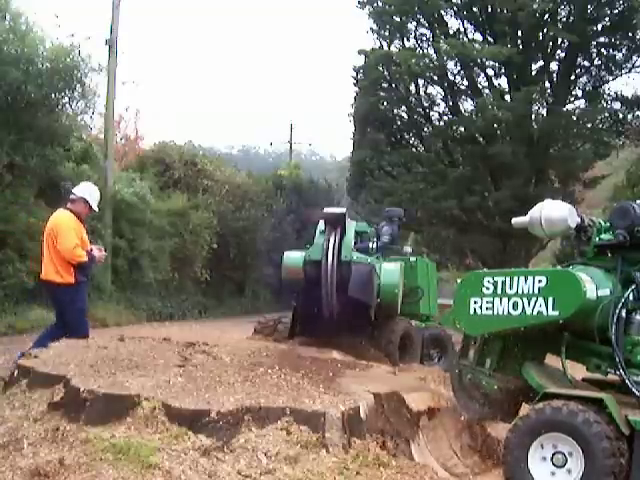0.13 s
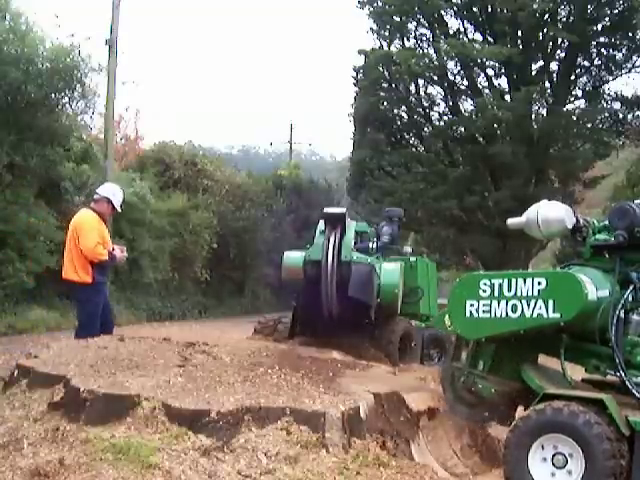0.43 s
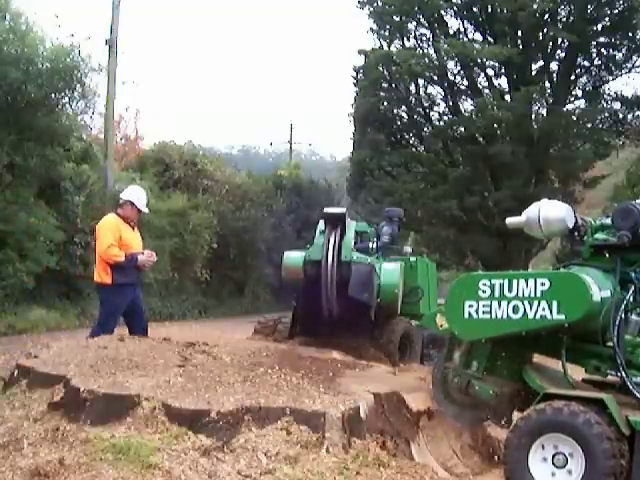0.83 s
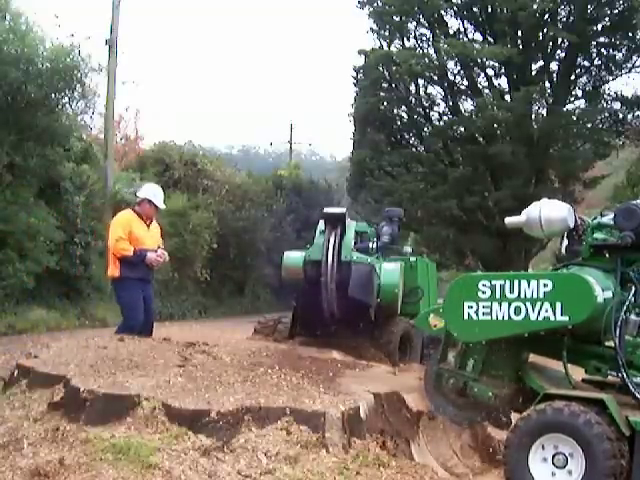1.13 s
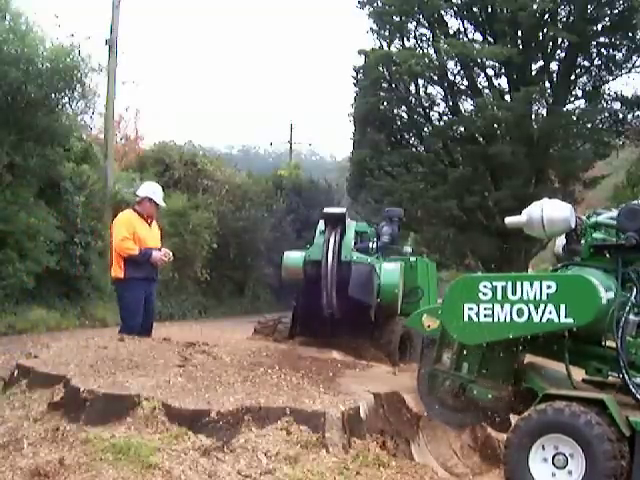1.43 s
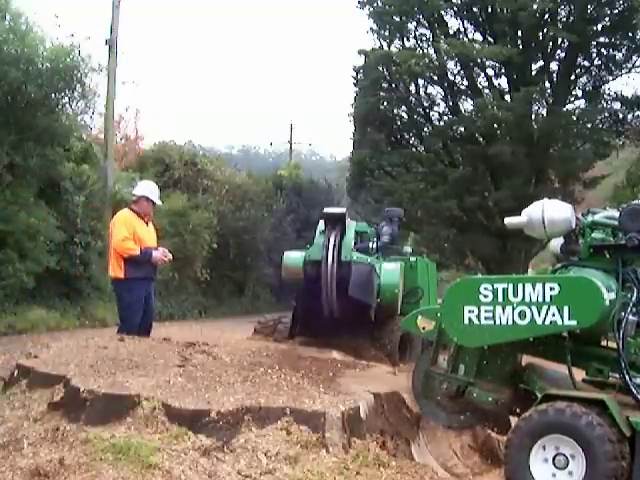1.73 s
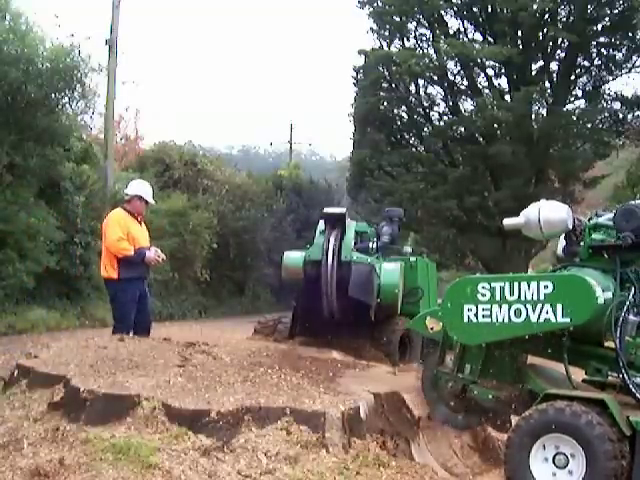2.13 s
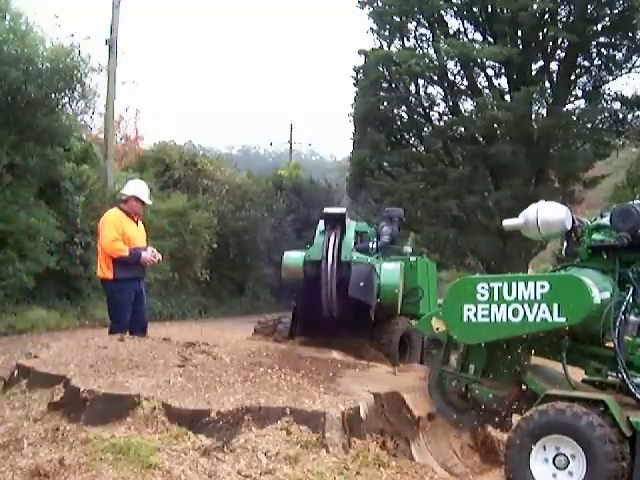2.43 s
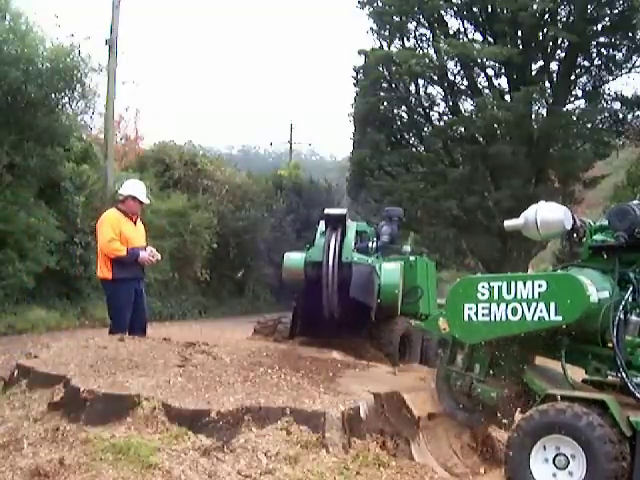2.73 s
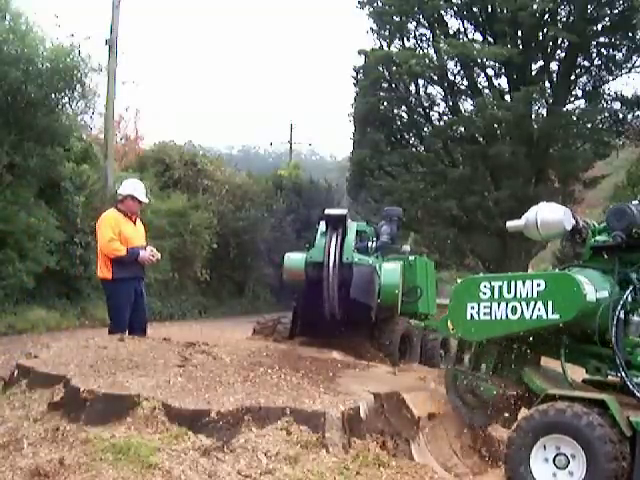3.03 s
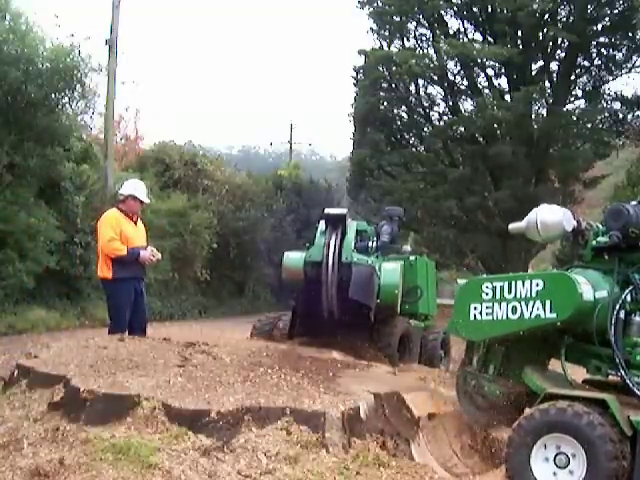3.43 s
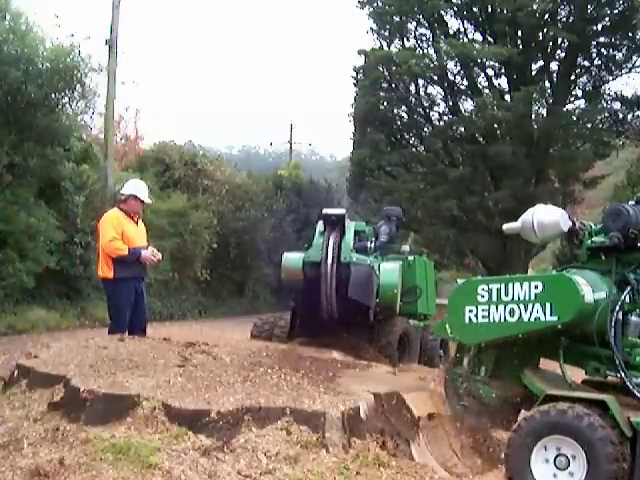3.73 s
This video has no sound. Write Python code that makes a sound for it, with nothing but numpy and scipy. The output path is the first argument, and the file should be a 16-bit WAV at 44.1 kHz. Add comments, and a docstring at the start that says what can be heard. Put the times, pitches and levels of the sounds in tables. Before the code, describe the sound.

A stump grinder cuts wood outdoors over two engines at full throttle, a low drone and a smaller buzz with exhaust boom and fan roar throughout. The cutter wheel bites in a fast rattle from about 0.3 to 1.4 seconds, again around 2, more lightly around 2.5, and from 3.5 to the end. The bites carry a brief steel ring, and wood chips patter.

```python
"""A stump grinder's belt-driven cutter wheel sweeps over a stump. Each tooth that touches the wood
strikes once a turn, so every bite is a fast rattle, with a brief steel ring and a patter of chips.
Underneath, two grinders run outdoors at full throttle: a large engine drones, a smaller one buzzes,
and exhaust boom and fan roar fill out the bed."""
import sys
import numpy as np
from scipy import signal
from scipy.fft import rfft, irfft, next_fast_len
from scipy.io import wavfile
from scipy.ndimage import uniform_filter1d

SR = 44100
rng = np.random.default_rng(int(sys.argv[2]) if len(sys.argv) > 2 else 0)


def to_wav(s):
    """Save 16-bit WAV."""
    ch = np.atleast_2d(s).T  # columns
    pcm = np.round(np.clip(ch, -1, 1) * 32767)  # PCM
    wavfile.write(sys.argv[1], SR, pcm.astype(np.int16))


N = 171108


def amp(db):
    """Decibels to gain."""
    return 10 ** (np.asarray(db) / 20)


def unit(x):
    """Scales to rms 1."""
    return x / np.sqrt(np.mean(x ** 2) + 1e-20)


def curve(points):
    """An automation curve at every sample."""
    return np.interp(np.arange(N) / SR, *np.transpose(points))


def eq_db(points, hz):
    """Reads an EQ curve on a logarithmic frequency axis."""
    point_hz, db = np.transpose(points)
    return np.interp(np.log(hz + 1), np.log(point_hz + 1), db)


def colour(x, points):
    """Shapes a sound with an EQ curve and scales it to rms 1."""
    size = next_fast_len(len(x) + 2048)
    gain = amp(eq_db(points, np.fft.rfftfreq(size, 1 / SR)))
    return unit(irfft(rfft(x, size) * gain, size)[:len(x)])


def drift(rate_hz):
    """Slow random modulation, rms about 1."""
    control_hz = 400
    hz = np.fft.rfftfreq(2048, 1 / control_hz)
    slow = irfft(rfft(rng.standard_normal(2048)) / (1 + (hz / rate_hz) ** 2))
    return np.interp(np.arange(N) * control_hz / SR, np.arange(2048), unit(slow))


def partial(turns, db, waver, rate_hz=4):
    """One engine partial that wavers in level and phase."""
    angle = 2 * np.pi * (turns + rng.random()) + waver * drift(rate_hz)
    return np.sqrt(2 / (1 + waver ** 2)) * amp(db) * (1 + waver * drift(rate_hz)) * np.cos(angle)


def add(mix, start_s, sound):
    """Mixes a sound in at a time."""
    part = mix[max(round(start_s * SR), 0):][:len(sound)]
    part += sound[:len(part)]


# The muffler's tone. Each row: frequency in Hz, relative level in dB.
BOOM_EQ = [(20, -39), (80, -22.5), (140, -21), (163, -5), (177, 3.5), (192, -7), (230, -19), (330, -34),
           (900, -62)]
# The boom's fader. Each row: time in seconds, level in dB.
BOOM_FADER = [(0, -26), (.15, -31), (.45, -29), (.7, -26.5), (1.0, -28), (1.35, -29), (1.75, -31),
              (1.92, -27), (2.25, -30), (2.9, -32.5), (3.27, -28.5), (3.38, -32), (3.46, -23.5),
              (3.56, -29), (3.88, -32.5)]


def exhaust_boom():
    """Exhaust gas booms in the muffler: a low, resonant band of noise."""
    boom = colour(rng.standard_normal(N), BOOM_EQ)
    boom /= np.sqrt(uniform_filter1d(boom ** 2, size=4000) + .05)  # evens out chance swells
    return boom * amp(curve(BOOM_FADER))


# The roar's tone. Each row: frequency in Hz, relative level in dB.
ROAR_EQ = [(20, -10), (35, 2.5), (60, -4.5), (110, 8.5), (250, -1.5), (390, 9), (460, -2.5), (550, 3.5),
           (720, -2), (1030, -1.5), (1250, -5), (1750, -7), (2200, -10), (3500, -12.5), (5000, -17.5),
           (7400, -20), (8600, -41)]
# The roar's fader. Each row: time in seconds, level in dB.
ROAR_FADER = [(0, -30), (.2, -31.5), (.45, -27.5), (.75, -27), (1.1, -29.5), (1.6, -31), (2.0, -29),
              (2.3, -33.5), (2.6, -30.5), (2.9, -32.5), (3.3, -28.5), (3.88, -31)]


def fan_roar(cycles):
    """Fans and machinery roar, pulsing with the large engine's firings and its working cycle."""
    firings = 6 * cycles
    clatter = 0.11 * np.cos(2 * np.pi * firings)
    throb = 0.092 * np.cos(2 * np.pi * cycles)
    return colour((1 + clatter + throb) * rng.standard_normal(N), ROAR_EQ) * amp(curve(ROAR_FADER))


# The small engine's pitch. Each row: time in seconds, firing rate in Hz.
BUZZ_PITCH = [(0, 130.5), (.25, 130.3), (.38, 130.7), (.55, 130.2), (.78, 130.7), (1.05, 130.25),
              (1.4, 130.5), (1.95, 130.7), (2.2, 129.9), (2.7, 130.2), (3.05, 131.1), (3.4, 130.5),
              (3.68, 129.6), (3.88, 130.3)]
# Its harmonics. Each row: multiple of the firing rate, level in dB.
BUZZ_HARMONICS = [(1, -49), (2, -43), (3, -37), (4, -46.5), (5, -41.5), (6, -43), (7, -41.5), (8, -52)]


def small_engine():
    """A rough buzz whose governor hunts a little."""
    firings = np.cumsum(curve(BUZZ_PITCH)) / SR
    return sum(partial(k * firings, db, waver=0.24, rate_hz=1.4) for k, db in BUZZ_HARMONICS)


# The large engine's speed. Each row: time in seconds, working cycles per second.
ENGINE_SPEED = [(0, 24.943), (1.9, 24.95), (2.2, 24.92), (2.9, 24.92), (3.3, 24.88), (3.55, 24.77),
                (3.88, 24.77)]


def engine_cycles():
    """The large engine's running count of cycles: the clock for drone, roar and wheel."""
    return np.cumsum(curve(ENGINE_SPEED)) / SR


# Faders for the swelling harmonics 3, 6, 9 and 12. Each row: time in seconds, level in dB.
THIRD_FADER = [(0, -30.5), (0.4, -38.5), (0.65, -31.5), (1.7, -34), (2, -27.5), (2.35, -32.5),
               (2.95, -36.5), (3.25, -31), (3.5, -29), (3.65, -36), (3.88, -29.5)]
SIXTH_FADER = [(0, -17), (0.08, -20), (0.22, -26.5), (0.33, -37), (0.42, -29.5), (0.62, -30.5),
               (0.778, -22), (1.45, -20.5), (1.65, -18.5), (1.88, -18.5), (2, -22.5), (2.199, -19.5),
               (2.8, -20), (3.08, -23), (3.27, -31.5), (3.45, -19), (3.65, -24), (3.88, -23)]
NINTH_FADER = [(0, -34), (0.27, -30.5), (0.6, -41.5), (0.74, -40), (1.1, -36.5), (1.5, -32), (1.75, -29),
               (1.88, -39), (2.1, -28.5), (2.7, -31), (2.95, -35), (3.1, -54), (3.3, -27), (3.47, -38.5),
               (3.6, -34), (3.88, -31)]
TWELFTH_FADER = [(0.101, -36.5), (0.55, -35.5), (0.85, -32.5), (1.3, -31), (1.7, -38.5), (1.95, -31),
                 (2.299, -37), (2.7, -39), (3.3, -34.5), (3.75, -41)]
# The drone's steady body and two whines. Each row: multiple of the cycle rate, level in dB.
DRONE_BODY = [(2, -41.5), (4, -41.5), (5, -50.5), (7, -36), (8, -45.5), (10, -48.5), (11, -53), (13, -44.5),
              (14, -51.5), (15, -44), (16, -40), (17, -46), (18, -54), (19, -56), (21, -50), (22, -45.5),
              (23, -45), (24, -55.5), (25, -50.5), (26, -50.5), (28, -52)]
DRONE_WHINES = [(54, -51), (69, -48.5)]
# The drone's top end. Each row: frequency in Hz, typical level of a harmonic there in dB.
DRONE_TOP = [(720, -67.5), (850, -58.5), (1050, -57), (1250, -63.5), (1750, -57.5), (2400, -66.5)]


def large_engine(cycles):
    """Six firings to a cycle: a strong firing tone among the multiples of the cycle rate."""
    cycles = cycles + 0.0008 * drift(rate_hz=20)  # timing jitter
    swelling = [(3, THIRD_FADER), (6, SIXTH_FADER), (9, NINTH_FADER), (12, TWELFTH_FADER)]
    drone = sum(partial(k * cycles, curve(fader), waver=0.02) for k, fader in swelling)
    drone += sum(partial(k * cycles, db, waver=0.1) for k, db in DRONE_BODY + DRONE_WHINES)
    cycle_hz = ENGINE_SPEED[0][1]
    for k in range(29, 90):
        db = eq_db(DRONE_TOP, k * cycle_hz) + 2.2 * rng.standard_normal()
        drone += partial(k * cycles, db, waver=0.54)
    return drone


def echoes(cutting, level_db=-13.5, t60_s=0.12):
    """The strikes scatter briefly off the machines and a hedge."""
    t = np.arange(SR // 4) / SR
    tail = rng.standard_normal(len(t)) * (rng.random(len(t)) < .05) * amp(-60 * t / t60_s)
    return amp(level_db) * signal.fftconvolve(cutting, tail / np.linalg.norm(tail))[:N]


# The tone of strikes and chips, with the guard's ringing resonances.
# Each row: frequency in Hz, relative level in dB.
CUT_EQ = [(100, -17), (400, 4.5), (1000, 2), (1700, 8.5), (2200, -1), (2700, 9), (3050, 1.5), (3400, 3.5),
          (3850, 3), (4250, 0), (5100, 1.5), (5900, 1), (6600, 4), (7400, 4.5), (8600, -14)]


def chips(cutting, per_second=310, level_db=-55, decay_s=0.0013):
    """Chips patter on the guard and the ground throughout, louder while the wheel bites."""
    hits = rng.random(N) < per_second / SR
    accent_db = 0.5 * np.minimum(rng.exponential(1, N), 4)
    envelope = signal.lfilter([1], [1, -np.exp(-1 / (decay_s * SR))], hits * amp(accent_db))
    patter = colour(envelope * rng.standard_normal(N), CUT_EQ)
    spray = unit(np.sqrt(abs(uniform_filter1d(cutting ** 2, size=5000))))  # follows the cut's level
    return amp(level_db) * patter * (0.7 + spray)


# The steel wheel's modes. Each row: frequency in Hz, gain in dB, seconds to fall by 60 dB.
STEEL_MODES = [(3440, -41.5, .04), (4210, -43.5, 0.029), (4440, -43.5, 0.071), (5630, -42, 0.025)]


def wheel_ring(cutting):
    """The steel wheel rings briefly after each strike."""
    t = np.arange(SR // 10) / SR
    ring = sum(amp(db - 60 * t / t60) * np.cos(2 * np.pi * hz * t) for hz, db, t60 in STEEL_MODES)
    return signal.fftconvolve(cutting, ring)[:N]


PRE_ROLL_S, HIGH_CUT_HZ = .005, 8750


def tooth_strike(bright_hz, crack_s, rise_s=0.00075, scrape_s=0.004, scrape_db=-26.5):
    """One tooth tears the wood: a grainy crack and a short scrape, coloured anew each time."""
    t, hz = np.arange(2048) / SR - PRE_ROLL_S, np.fft.rfftfreq(2048, 1 / SR)
    after = np.maximum(t, 0)
    attack = np.exp(np.minimum(t, 0) / rise_s)
    envelope = attack * (np.exp(-after / crack_s) + amp(scrape_db) * np.exp(-after / scrape_s))
    grain_db = 3 * rng.standard_normal(128)
    fibres = unit(np.repeat(amp(grain_db), 16)) * rng.standard_normal(2048)
    mottle_db = 1.8 * unit(uniform_filter1d(rng.standard_normal(len(hz)), size=30))
    octaves_off = np.log2((hz + 1) / bright_hz)
    boost_db = 7.5 * np.exp(-.5 * (octaves_off / .55) ** 2)
    gain = amp(eq_db(CUT_EQ, hz) + boost_db + mottle_db) * (hz < HIGH_CUT_HZ)
    return unit(irfft(rfft(envelope * fibres) * gain)) * np.sqrt(np.mean(envelope ** 2))


# One tooth's bite per row. Each row: start, deepest point and end in seconds, the tooth's place on
# the wheel at start and at end in turns, gain at the deepest point in dB, centre of the treble boost
# in Hz, decay time of the crack in seconds.
TOOTH_BITES = [(0.286, 0.38, 0.85, 0.14, .125, -19, 3370, 0.001),
               (0.283, 0.397, 0.76, .66, .63, -19, 3200, .0011),
               (0.236, 0.316, 0.44, 1, 0.89, -21, 4000, .001),
               (0.286, 0.344, 0.44, 0.41, .44, -25, 4140, 0.00068),
               (0.678, 0.873, 1.38, .105, 0.12, -24, 4740, 0.0021),
               (0.677, 0.875, 1.46, .61, .645, -19, 4560, 0.0017),
               (0.544, 0.78, 0.85, 0.91, .915, -24, 7000, 0.0014),
               (1.87, 1.984, 2.04, .01, .07, -25, 5270, .0028),
               (1.868, 1.986, 2.24, .29, .4, -24, 5830, 0.0028),
               (1.881, 1.996, 2.22, .52, .59, -25.5, 5420, 0.002),
               (1.873, 2.039, 2.24, .8, .91, -24, 5800, 0.0041),
               (2.266, 2.525, 2.88, .43, .41, -27, 6640, 0.0012),
               (2.405, 2.563, 2.57, .6, .63, -24, 6200, 0.002),
               (2.285, 2.535, 2.85, .92, .915, -28, 6520, 0.0015),
               (3.522, 3.644, 4.7, .445, .45, -22, 3270, 0.0014),
               (3.521, 3.647, 3.87, 0.98, 0.93, -19, 3298, 0.0016),
               (3.533, 3.601, 3.8, .75, .74, -23, 3400, 0.00093),
               (3.532, 3.604, 3.64, 0.28, 0.21, -20, 3400, .001)]


def cutter_wheel(cycles, belt_ratio=.9, entry_db=-7.5, exit_db=-10.5, scatter_db=1.2, slip_s=.00025):
    """Each tooth in the wood strikes once a turn, harder as the bite deepens."""
    turns, t, rattle = belt_ratio * cycles, np.arange(N) / SR, np.zeros(N)
    for start, deepest, end, start_place, end_place, db, bright_hz, crack_s in TOOTH_BITES:
        passes = np.floor(turns - np.interp(t, [start, end], [start_place, end_place]))
        for hit_s in t[1:][np.diff(passes) > 0]:
            slip, force = rng.standard_normal(2)
            if start <= hit_s <= end:
                depth_db = np.interp(hit_s, [start, deepest, end], [entry_db, 0, exit_db])
                strike = amp(db + depth_db + scatter_db * force) * tooth_strike(bright_hz, crack_s)
                add(rattle, hit_s - PRE_ROLL_S + slip_s * slip, strike)
    return rattle


def scene():
    """The mono mix: the wheel in the stump over a bed of engines."""
    cycles = engine_cycles()
    bed = large_engine(cycles) + small_engine() + exhaust_boom() + fan_roar(cycles)
    cutting = cutter_wheel(cycles)
    return (bed + cutting + wheel_ring(cutting) + chips(cutting) + echoes(cutting))[None]


def record(dry):
    """Master EQ: a narrow notch in the treble and a steep high cut."""
    notch_hz, width_hz = 6890, 240
    notched = signal.lfilter(*signal.iirnotch(notch_hz, notch_hz / width_hz, SR), dry)
    high_cut = signal.firwin(301, HIGH_CUT_HZ, window=("kaiser", 9), fs=SR)
    return signal.oaconvolve(notched, high_cut[None], "same")


dry = scene()
out = record(dry)
to_wav(out)
```